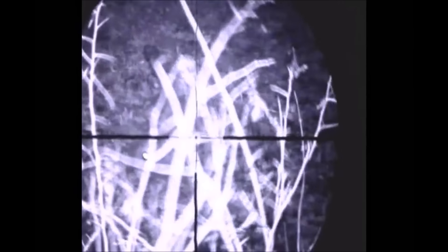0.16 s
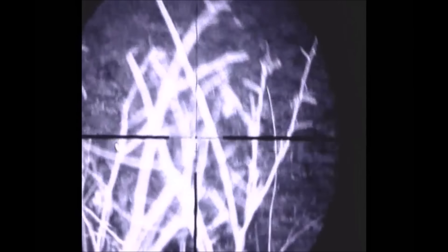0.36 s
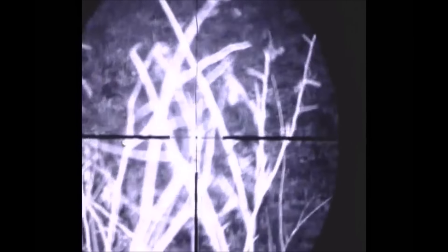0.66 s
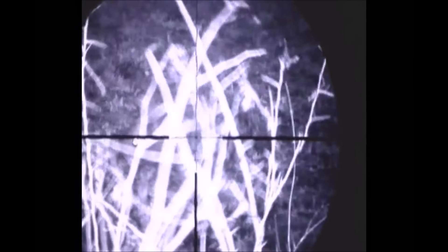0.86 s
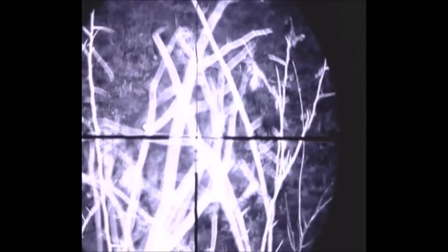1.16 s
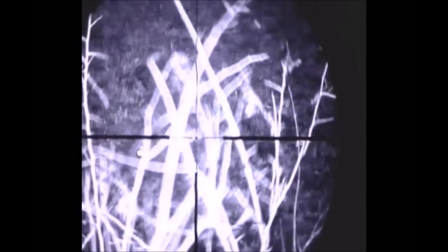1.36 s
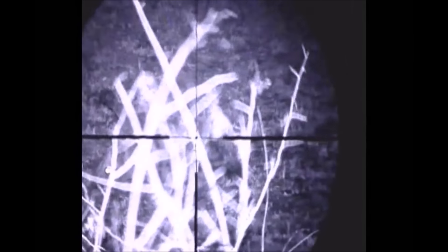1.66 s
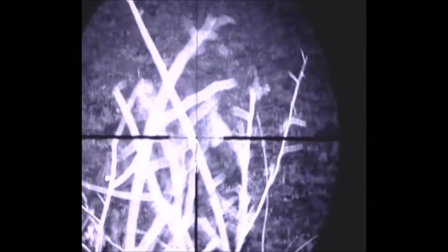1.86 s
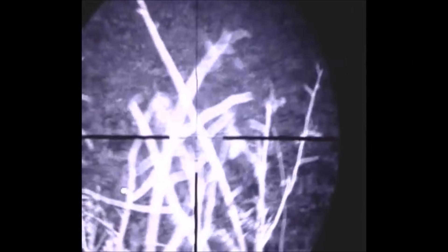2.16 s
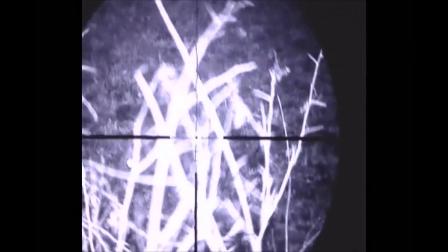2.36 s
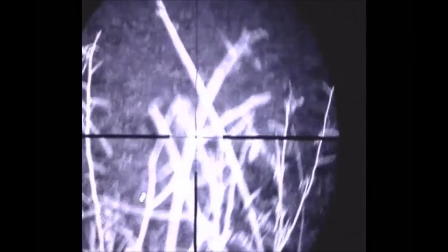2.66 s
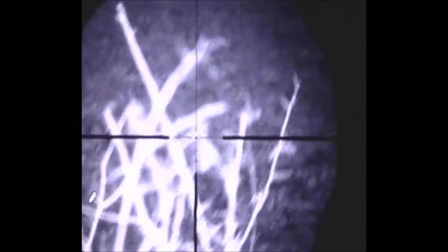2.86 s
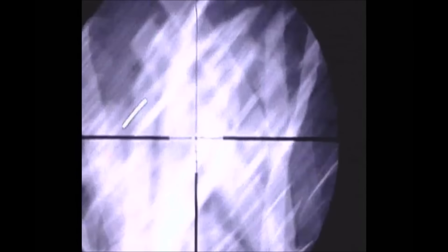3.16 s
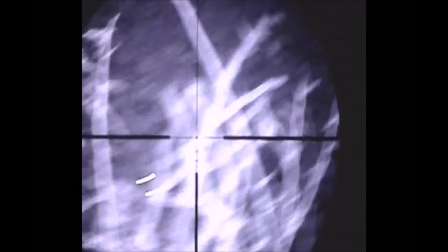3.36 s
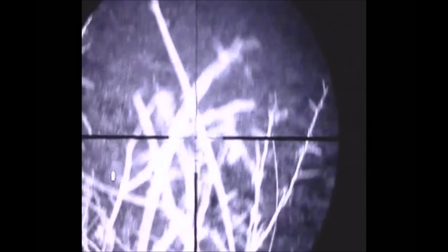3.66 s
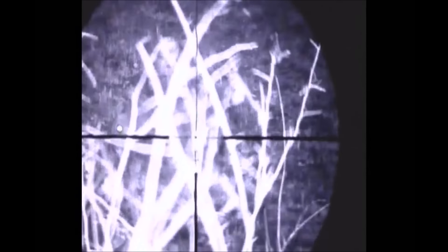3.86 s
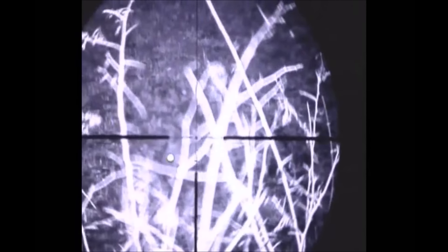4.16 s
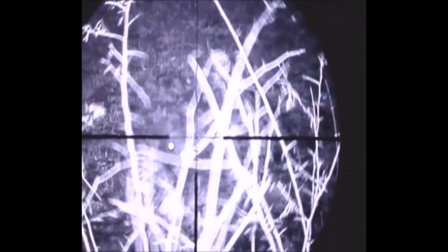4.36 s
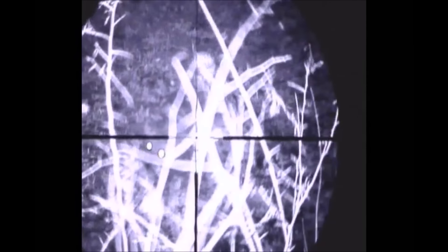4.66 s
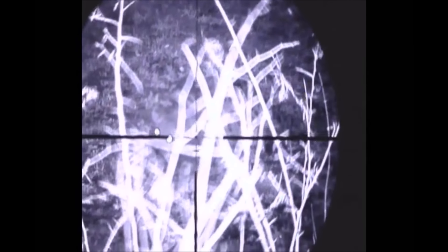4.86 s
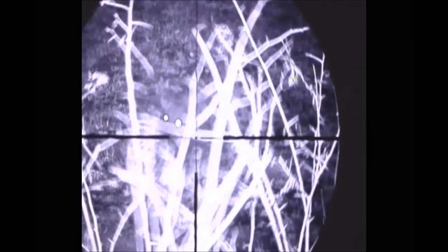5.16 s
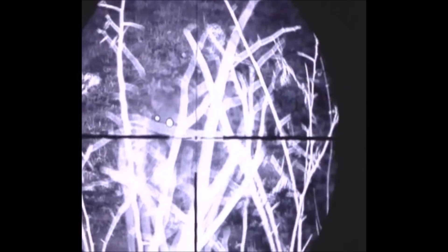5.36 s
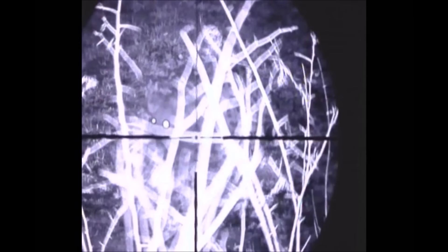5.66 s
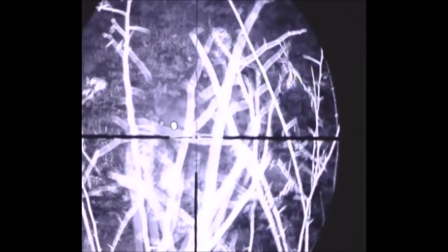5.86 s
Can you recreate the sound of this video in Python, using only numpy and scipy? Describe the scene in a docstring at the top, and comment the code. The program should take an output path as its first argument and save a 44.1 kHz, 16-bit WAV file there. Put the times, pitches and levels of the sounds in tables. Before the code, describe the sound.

A muffled night capture of hyena whoops: a fading call, a long steady hoot, hard handling knocks, then another hoot ending in a moan.

```python
"""Hyenas whoop in the bush at night: hoots glide over harmonics, and slack voices turn into growls.
Thin gliding tones and faint far hoots join them, and the bush returns a weak echo.
Hands on a recorder's boxy case click, scrape and thump: short noise bursts and dying sines.
Dull noise and a faint hum lie beneath; the narrow-band recorder flattens the loudest peaks."""
import sys
import numpy as np
from scipy import signal
from scipy.fft import rfft, irfft, next_fast_len
from scipy.io import wavfile
from scipy.ndimage import uniform_filter1d

SR = 44100
rng = np.random.default_rng(int(sys.argv[2]) if len(sys.argv) > 2 else 0)


def unload_audio(sound):
    """Save the sound as a 16-bit wav file, at the path given as the first command line argument."""
    columns = np.transpose(np.atleast_2d(sound))
    # keep every value between -1 and 1, then stretch to whole-number steps
    steps = np.round(np.clip(columns, -1, 1) * 32767)
    wavfile.write(sys.argv[1], SR, steps.astype(np.int16))


N = 264600  # length of the scene in samples: 6 s


def amp(db):
    """Turns decibels into a plain factor."""
    return 10 ** (np.asarray(db) / 20)


def unit(x):
    """Scales a sound to an average (rms) level of 1."""
    return x / np.sqrt(np.mean(x ** 2) + 1e-20)


def read(points, hz):
    """Reads a curve of (Hz, value) points, with the frequencies spaced as on a log scale."""
    f, value = np.transpose(points)
    return np.interp(np.log(hz + 1), np.log(f + 1), value)


def add(mix, s, sound):
    """Adds a sound to the mix from second s on, cutting off what runs past the end."""
    part = mix[max(round(s * SR), 0):][:len(sound)]
    part += sound[:len(part)]


def filtered(x, gain):
    """Applies a gain, given as a function of Hz."""
    size = next_fast_len(len(x) + 4096)
    spectrum = rfft(x, size) * gain(np.fft.rfftfreq(size, 1 / SR))
    return irfft(spectrum, size)[:len(x)]


def wander(size, hz):
    """Random drift up to about hz; its rms is 1 over the length of the scene."""
    noise = rng.standard_normal(N)
    return unit(filtered(noise, lambda f: 1 / (1 + (f / hz) ** 4)))[:size]


def controls(rows):
    """Start time, a soft gate and every column of a curve at each sample."""
    s, *columns = np.transpose(rows)
    t = np.arange(s[0], s[-1], 1 / SR)
    gate = np.clip(np.minimum(t - t[0], t[-1] - t) / .008, 0, 1)  # 8 ms ramps
    return s[0], gate, *(uniform_filter1d(np.interp(t, s, c), size=400) for c in columns)


def case_ring(x):
    """Each resonance of the case rings as a dying sine; a wider one dies sooner."""
    # Resonances of the case. Each row: frequency in Hz, width in Hz, gain in dB.
    resonances = [(347, 11, -2), (414.2, 66, 14.5), (429, 28, -9.5), (701, 60, 13.5), (818, 180, 5.5),
                  (1050, 37, -12.5), (1505, 130, -10), (1830, 46, -10), (2600, 58, -19.5), (3050, 200, -39),
                  (3440, 490, -20)]
    t = np.arange(SR // 8) / SR
    ring = np.zeros(len(t))
    for hz, width, db in resonances:
        ring += amp(db) * width * np.exp(-np.pi * width * t) * np.sin(2 * np.pi * hz * t)
    return signal.fftconvolve(x, ring)[:len(x)]


def whoop(rows, creak, jitter, rasp_db, growl_db, third_db, slope_db):
    """A nearly pure hoot at high pitch; as the folds slacken, overtones take over and cycles alternate."""
    # Gain that the recorder's case gives each harmonic. Each row: frequency in Hz, gain in dB.
    case_gain = [(200, -15), (290, -0.5), (345, 20), (365, 18.5), (390, 8.5), (440, 16.5), (480, -5.5),
                 (560, 1), (650, -6.5), (730, 6), (810, -19), (930, -12.5), (1100, -28), (1220, -42),
                 (1400, -41), (1620, -36.5), (2200, -64.5)]
    slack_hz, slack_span_hz = 220, 40  # below this pitch the voice turns into a growl
    taut_hz, taut_span_hz, pure_db = 317.2, 30, -19.5  # above this pitch the overtones drop away
    start, gate, hz, effort_db = controls(rows)
    size = len(hz)
    slack = np.clip((slack_hz - hz) / slack_span_hz, 0, 1)
    taut = np.clip((hz - taut_hz) / taut_span_hz, 0, 1)
    unsteady_hz = hz * (1 + (.002 + jitter * slack) * wander(size, 70))
    turns = np.cumsum(unsteady_hz) / SR  # cycles so far

    overtones, power = np.zeros(size), np.zeros(size)
    for k in np.arange(3, 29) / 2:  # multiples of the pitch: 1.5, 2, 2.5 .. 14
        # the slope in dB per octave acts from the 2nd to the 5th harmonic and stays level above
        weight = amp(read(case_gain, k * hz) + slope_db * np.log2(np.clip(k, 2, 5) / 2))
        if k % 1:  # strong and weak cycles in turn put lines between the harmonics
            weight *= creak * slack
        # the third harmonic is weak unless the folds are slack
        weight *= amp(third_db * (k == 3) * (1 - slack) + pure_db * taut)
        # this phase spreads each pulse over its cycle
        overtones += weight * np.cos(2 * np.pi * k * turns - np.pi * k ** 2 / 2)
        power += weight ** 2 / 2
    overtones *= 1 + (.06 + .1 * slack) * wander(size, 60)

    # air escapes in one puff a cycle
    puffs = rng.standard_normal(size) * (1 + np.cos(2 * np.pi * turns))
    rasp = unit(case_ring(puffs))
    overtones += amp(rasp_db + (growl_db - rasp_db) * slack) * np.sqrt(power) * rasp

    fundamental_db = read(case_gain, hz) - 8 + 0.21 * wander(size, 32)
    fundamental = amp(fundamental_db) * np.cos(2 * np.pi * turns)
    return start, gate * np.sqrt(2) * amp(effort_db) * (fundamental + overtones)


def thin_tone(hz, tone_db, octave_db, waver):
    """A wavering tone and its octave, with soft ends."""
    angle = 2 * np.pi * np.cumsum(hz * (1 + waver * wander(len(hz), 42))) / SR
    tones = amp(tone_db) * np.sin(angle) + amp(octave_db) * np.sin(2 * angle)
    return signal.windows.tukey(len(hz), .1) * np.sqrt(2) * tones


def whistle(top_s, top_hz, db, octave_db, sag, fade_db):
    """A second, thin voice swells as it scoops up to its top, then sags and fades steadily."""
    scoop_s, sag_s = .18, .55  # seconds before and after the top
    scoop_depth = .21  # share of the top pitch missing at the start
    scoop_db = -14.5  # start of the octave against its top; the tone itself starts half as far down
    t = np.arange(-scoop_s, sag_s, 1 / SR)
    scoop = (np.minimum(t, 0) / scoop_s) ** 2
    after = np.maximum(t, 0)
    hz = top_hz * (1 - scoop_depth * scoop - sag * after)
    tone = thin_tone(hz, db + scoop_db * scoop / 2, octave_db + scoop_db * scoop, waver=.003)
    tone *= amp(-fade_db * after)
    return max(top_s - scoop_s, 0), tone[t + top_s >= 0]


def far_hoot(start, length, hz, db, octave_db):
    """A far hyena: a faint wavering note without a glide, which starts quickly and fades."""
    t = np.arange(0, length, 1 / SR)
    envelope = np.minimum(t / .015, 1) * amp(-11 * (t / length) ** 2)  # 15 ms rise, 11 dB fade
    return start, envelope * thin_tone(np.full(len(t), hz), db, octave_db, waver=.015)


def bush(x, t60):
    """Trunks and thickets scatter a weak tail, which falls by 60 dB in t60 seconds."""
    t = np.arange(SR) / SR
    scatter = rng.standard_normal(SR) * (t > .02)  # nothing returns in the first 20 ms
    tail = case_ring(scatter) * amp(-60 * t / t60)
    tail /= np.sqrt(np.mean(abs(rfft(tail)[300:800]) ** 2))  # average gain 1 from 300 to 800 Hz
    return signal.fftconvolve(x, tail)[:N]


def clicks(body_db, treble_db, split_hz, rise):
    """Short bursts of friction ring the case; each contact has its own share of treble."""
    # Clicks and scrapes of fingers on the case. Each row: start in seconds, level in dB,
    # treble against that level in dB, decay in seconds; body_db and treble_db come on top.
    contacts = [(0.019, -23.5, -16.5, 0.0027), (0.353, -35.5, -23.5, 0.0026), (0.411, -39.5, -4.5, 0.0092),
                (0.586, -37.5, -20, 0.0031), (0.694, -32, -16, 0.0088), (0.731, -24, -18.5, 0.0061),
                (0.807, -27, -8, 0.005), (0.879, -38, 0, 0.0065), (0.901, -27, -16, 0.009),
                (0.945, -35, -38, 0.0084), (1.041, -36.5, -27.5, 0.01), (2.079, -39.5, -5, 0.02),
                (2.334, -31, -28.5, 0.0064), (2.904, -42, -3.5, 0.04), (2.962, -21, -30.5, 0.023),
                (2.991, -27.5, -12.5, 0.0098), (3.043, -25, -19.5, 0.014), (3.113, -11, -18, 0.012),
                (3.127, -5.5, -28.5, 0.015), (3.173, -18, -25.5, 0.0079), (3.184, -2.5, -17, 0.006),
                (3.267, -28, -39, 0.0052), (3.285, -14.5, -18, 0.012), (3.474, -12.5, -21, 0.0069)]
    out, t = np.zeros(N), np.arange(SR // 6) / SR
    low = signal.butter(4, split_hz, "low", fs=SR, output="sos")
    high = signal.butter(4, split_hz, "high", fs=SR, output="sos")
    for s, db, bright_db, decay in contacts:
        envelope = np.exp(-t / decay) * (1 - np.exp(-t / rise))
        burst = case_ring(rng.standard_normal(len(t)) * envelope)
        for band, part_db in ((low, body_db), (high, treble_db + bright_db)):
            part = signal.sosfilt(band, burst)
            loudest = np.sqrt(uniform_filter1d(part ** 2, size=220).max())  # rms over 5 ms
            add(out, s, amp(db + part_db) * part / loudest)
    return out


def rubbing(slips_per_s, snap_db):
    """A finger pressing ever harder sticks and slips; short sines of fluttering pitch add tiny squeaks."""
    # Tiny squeaks. Each row: start in seconds, level in dB, pitch in Hz, length in seconds.
    squeaks = [(2.093, -50, 3597, 0.038), (2.967, -46, 2556, 0.066), (3.022, -39.5, 2600, 0.027),
               (3.625, -43, 1900, 0.013), (3.616, -53, 2600, 0.031)]
    start_s, length_s, start_db, swell_db = 2.965, .24, -35, 9.5
    out = np.zeros(N)
    progress = np.linspace(0, 1, int(length_s * SR))
    slips = rng.standard_normal(len(progress)) * (rng.random(len(progress)) < slips_per_s / SR)
    snaps = np.gradient(np.gradient(slips))  # the sharp treble edges of the slips
    grain = unit(case_ring(slips)) + amp(snap_db) * unit(case_ring(snaps))
    envelope = signal.windows.tukey(len(grain), .1) * amp(start_db + swell_db * progress)
    add(out, start_s, envelope * grain)
    for s, db, hz, length in squeaks:
        size = int(length * SR)
        turns = np.cumsum(hz * (1 + 0.022 * wander(size, 300))) / SR
        add(out, s, amp(db) * np.hanning(size) * np.sin(2 * np.pi * turns))
    return out


def thumps(rise, knock_hz, knock_db, knock_decay):
    """A dull bump rocks the whole case as a fast-dying low sine, with a second sine as its knock."""
    # Bumps. Each row: start in seconds, level in dB, rocking frequency in Hz, decay in seconds.
    bumps = [(2.331, -2, 65.6, 0.01), (2.735, -8.5, 55, 0.0041), (2.935, -30.5, 45, 0.025),
             (3.125, -17, 161.8, 0.015), (3.19, -10, 58, 0.012), (3.286, -14, 49, .02),
             (3.325, -21, 29.4, 0.035), (3.479, -4.5, 38.8, 0.0085), (3.799, -26.5, 29.5, 0.021)]
    out, t = np.zeros(N), np.arange(SR // 4) / SR
    knock = amp(knock_db) * np.sin(2 * np.pi * knock_hz * t) * np.exp(-t / knock_decay)
    for s, db, hz, decay in bumps:
        rock = np.sin(2 * np.pi * hz * t) * np.exp(-t / decay)
        add(out, s, -amp(db) * (rock + knock) * (1 - np.exp(-t / rise)))
    return out


def night():
    """Low, dull background noise and a throbbing hum built from harmonics."""
    # Tone colour of the noise. Each row: frequency in Hz, relative level in dB.
    colour = [(12, -21.5), (20, 6), (22, -8.5), (111, -20), (183, -27.5), (283, -34), (352, -7), (383, -14),
              (487, -28), (720, -25), (802, -34.5), (1090, -37.5), (1240, -49), (1350, -44), (3590, -52.5),
              (4670, -74), (7900, -120)]
    air_db, hum_db, hum_hz = -43, -49, 26.9
    air = unit(filtered(rng.standard_normal(N), lambda f: amp(read(colour, f))))
    turns = np.cumsum(hum_hz * (1 + .008 * wander(N, 1.8))) / SR
    hum = unit(sum(np.cos(2 * np.pi * k * turns) / k ** 2.2 for k in range(1, 8)))
    return amp(air_db + 0.64 * wander(N, 18)) * air + amp(hum_db) * hum


def scene():
    """The hyenas, their echo, the handling noises and the background."""
    # One curve for each call. Each row: time in seconds, pitch in Hz, effort in dB; the sound
    # also swells wherever a harmonic meets a fixed resonance of the recorder's case.
    fading_whoop = [(0.0, 299, -25), (0.1, 269.8, -25.5), (0.15, 243.4, -28.5), (0.195, 217.3, -33),
                    (0.26, 167.5, -43), (0.33, 178, -42.5), (0.35, 122.1, -41), (0.41, 113.1, -44),
                    (0.45, 118.1, -66)]  # sinks into a growl
    grunt = [(0.495, 149.6, -51.5), (0.57, 135.2, -50.5)]  # a short afterthought to that growl
    near_whoop = [(0.97, 171.6, -51), (1.06, 213.8, -48), (1.19, 305.3, -32), (1.27, 336.5, -16),
                  (1.39, 346.3, -16.5), (1.47, 344.7, -15.5), (1.66, 362.8, -14.5), (1.89, 340.4, -15.5),
                  (2.02, 318.2, -21), (2.21, 306.9, -31), (2.33, 223.8, -35), (2.41, 184.3, -39.0),
                  (2.47, 167, -38), (2.49, 151.4, -44.5), (2.55, 140.6, -42.5), (2.59, 118.8, -47),
                  (2.68, 108.5, -68.5)]  # groan, long hoot, growl
    last_whoop = [(4.44, 173.3, -55), (4.52, 217, -49), (4.61, 262, -33), (4.7, 295.5, -27),
                  (4.88, 312, -26), (5.1, 325.6, -16.5), (5.4, 305.4, -27), (5.54, 265.7, -23.5),
                  (5.6, 241.3, -27), (5.66, 230.5, -32.5), (5.75, 232.4, -32.5), (5.92, 254.4, -27.5),
                  (6.0, 248.6, -26)]  # groan, hoot, low moan
    # Thin second voice. Each row: time of the top in seconds, top pitch in Hz, level in dB,
    # level of its octave in dB, sag as a share of the pitch per second, fade in dB per second.
    whistles = [(0.02, 1002, -50, -62.5, .17, 41), (1.28, 1060, -57, -57, .28, 68),
                (2.801, 1098, -56.5, -57.5, 0.31, 14.5), (4.82, 1044, -50, -48, .28, 40)]
    # Far hyena. Each row: start in seconds, length in seconds, pitch in Hz, level in dB,
    # level of its octave in dB.
    far_hoots = [(2.692, 0.099, 367, -33, -50), (2.795, .8, 359.8, -37, -46),
                 (3.724, 0.058, 349, -34.5, -77), (4.087, 0.068, 367, -50, -72.5)]
    voices = np.zeros(N)
    for rows in (fading_whoop, grunt):
        add(voices, *whoop(rows, creak=0.83, jitter=0.0087, rasp_db=-31.5, growl_db=-25.5,
                           third_db=-12, slope_db=-1.5))
    add(voices, *whoop(near_whoop, creak=.05, jitter=.003, rasp_db=-15, growl_db=-31,
                       third_db=-5.5, slope_db=2.5))
    add(voices, *whoop(last_whoop, creak=.1, jitter=0.0087, rasp_db=-24, growl_db=-18.5,
                       third_db=-5, slope_db=-2))
    for row in whistles:
        add(voices, *whistle(*row))
    for row in far_hoots:
        add(voices, *far_hoot(*row))
    echo = amp(-22.5) * bush(voices, t60=1.0)
    handling = clicks(body_db=-2.5, treble_db=-7.5, split_hz=2190, rise=0.0008)
    handling += rubbing(slips_per_s=210, snap_db=-18.5)
    handling += thumps(rise=0.00067, knock_hz=150, knock_db=-11, knock_decay=0.0085)
    return voices + echo + handling + night()


def record(dry, ceiling=0.518, slow_spread=0.028, fast_spread=.0055, excess_db=1):
    """A telephone-rate input flattens peaks at a ceiling; the output stage shaves them again."""
    limit = ceiling * (1 + slow_spread * wander(N, 16))
    slow = signal.resample(dry, N * 8000 // SR)  # 8000 samples per second
    top = signal.resample(limit, len(slow)) * (1 + fast_spread * rng.standard_normal(len(slow)))
    # flattening at the low rate folds the distortion back into the narrow band
    narrow = signal.resample(np.clip(slow, -top, top), N)
    narrow = filtered(narrow, lambda f: 1 / np.sqrt(1 + (f / 3870) ** 90))  # steep cut at 3870 Hz
    excess = narrow - np.clip(narrow, -limit, limit)
    out = narrow - amp(excess_db) * excess  # takes off slightly more than the excess
    treble_cut = signal.firwin(511, 15800, window=("kaiser", 9), fs=SR)  # cutoff in Hz
    return signal.oaconvolve(out, treble_cut, "same")[None]


dry = scene()
out = record(dry)
unload_audio(out)
```